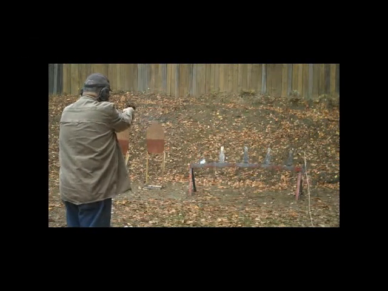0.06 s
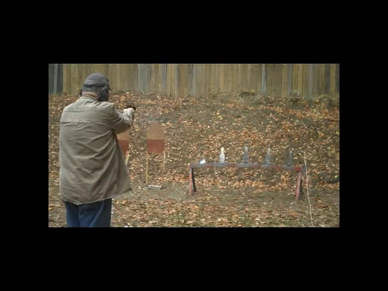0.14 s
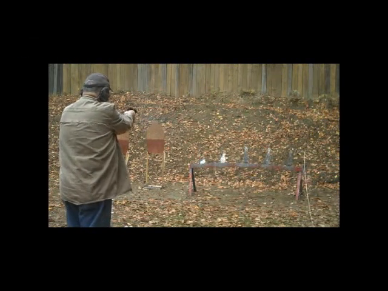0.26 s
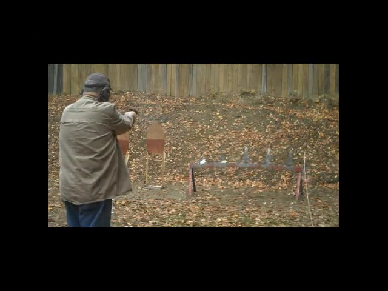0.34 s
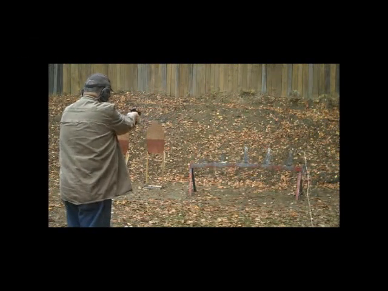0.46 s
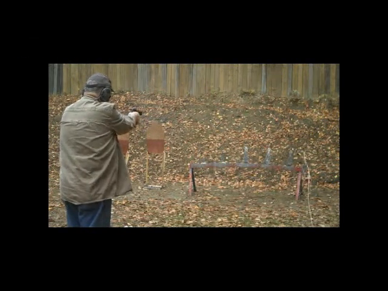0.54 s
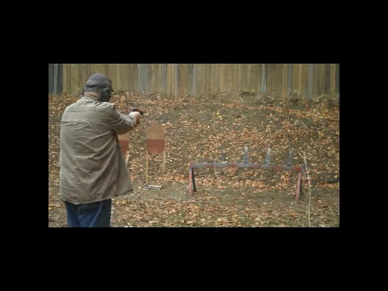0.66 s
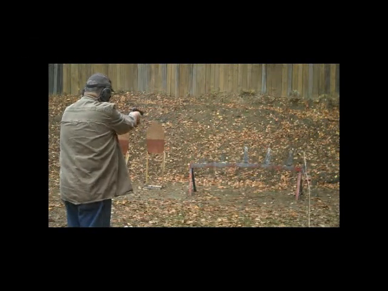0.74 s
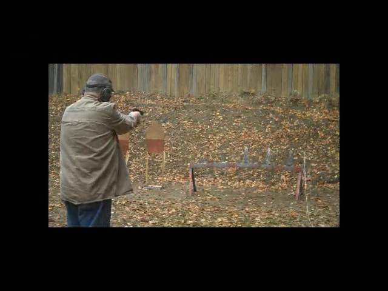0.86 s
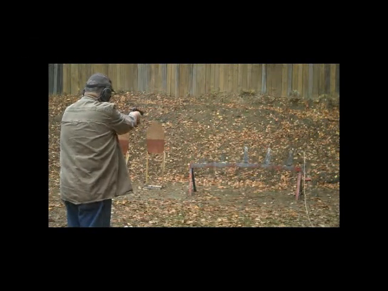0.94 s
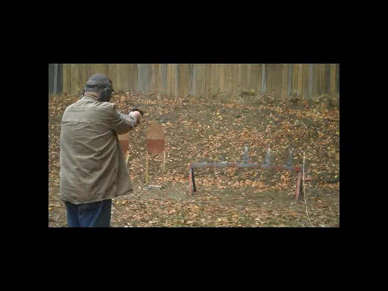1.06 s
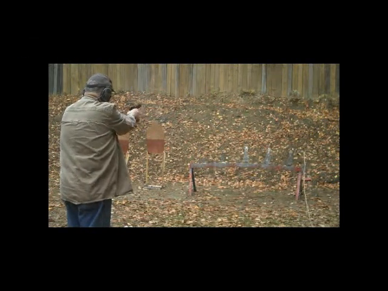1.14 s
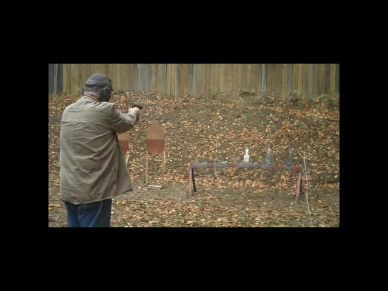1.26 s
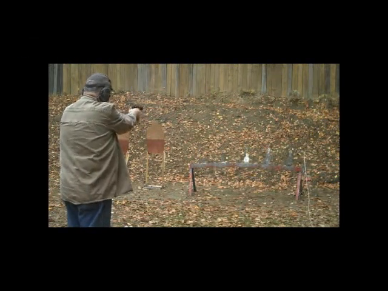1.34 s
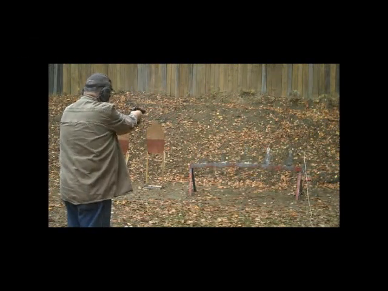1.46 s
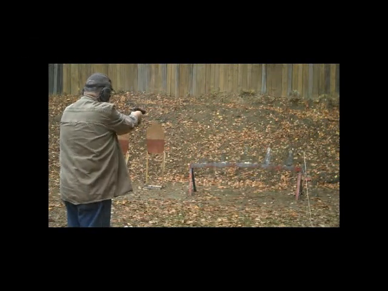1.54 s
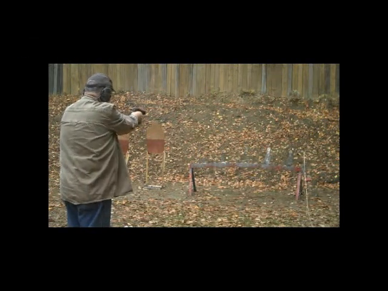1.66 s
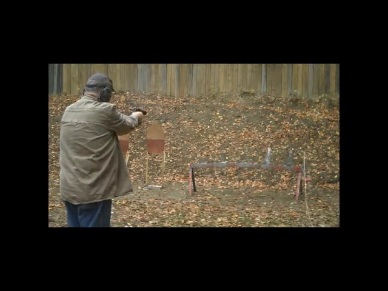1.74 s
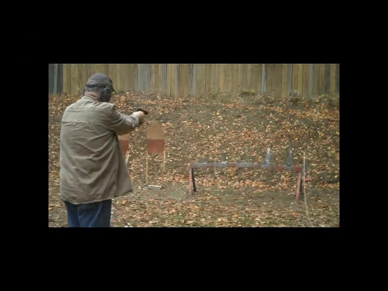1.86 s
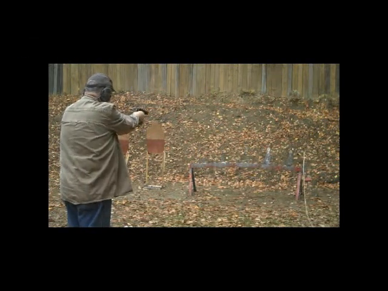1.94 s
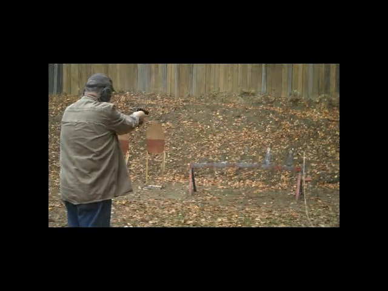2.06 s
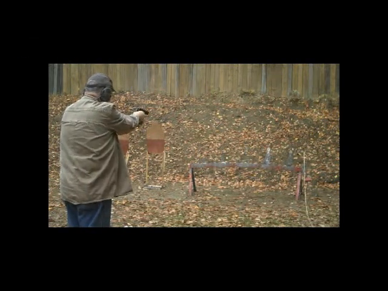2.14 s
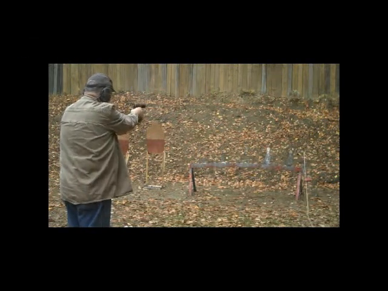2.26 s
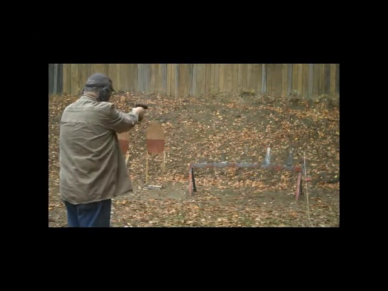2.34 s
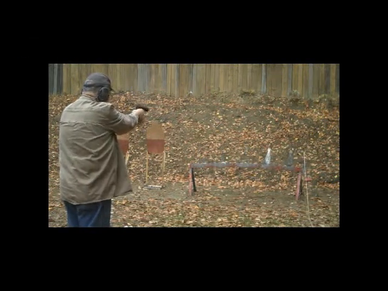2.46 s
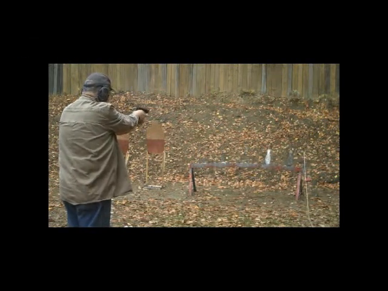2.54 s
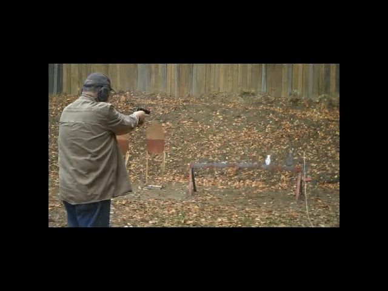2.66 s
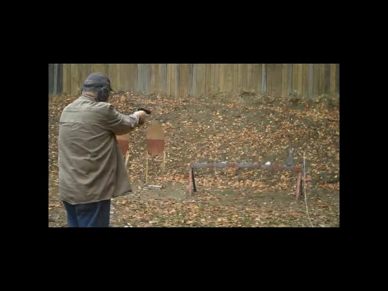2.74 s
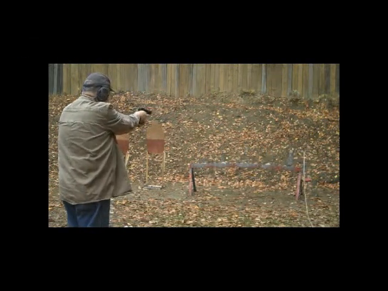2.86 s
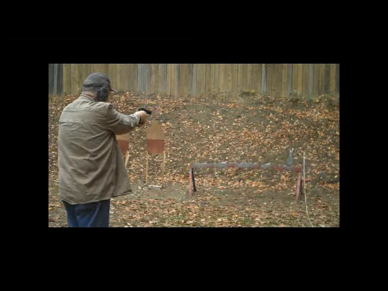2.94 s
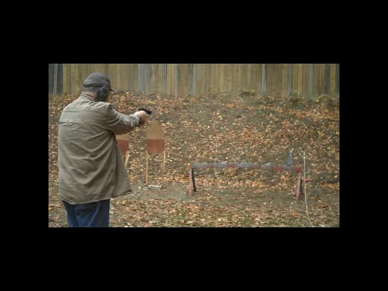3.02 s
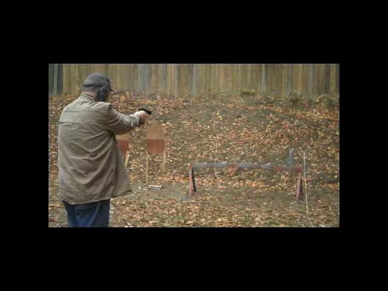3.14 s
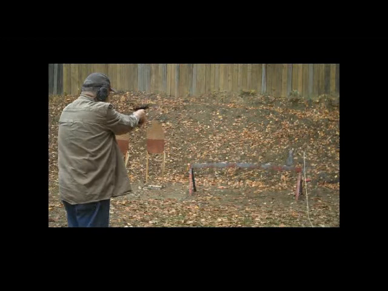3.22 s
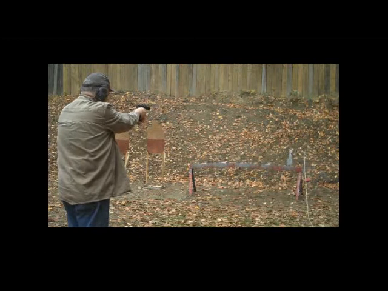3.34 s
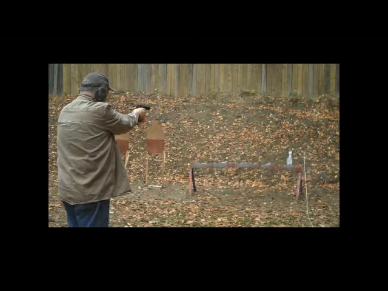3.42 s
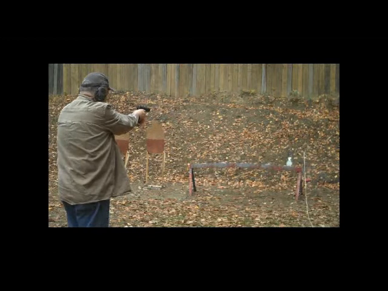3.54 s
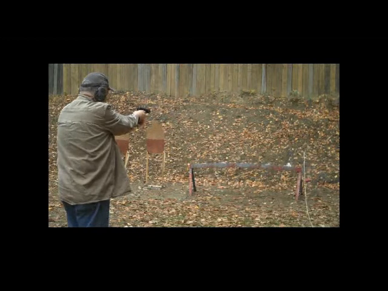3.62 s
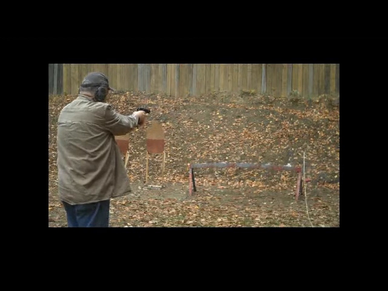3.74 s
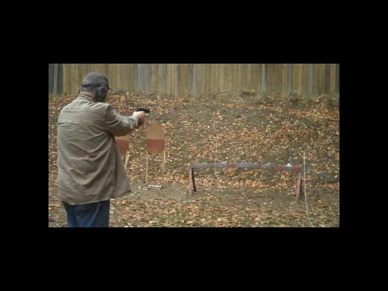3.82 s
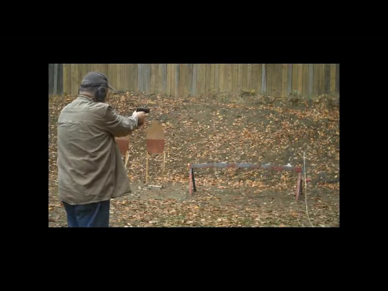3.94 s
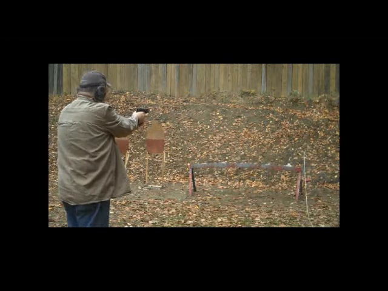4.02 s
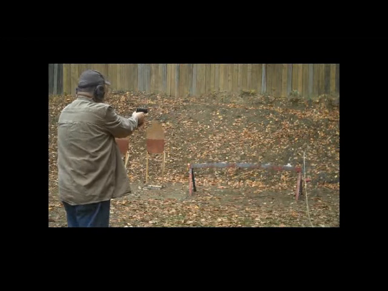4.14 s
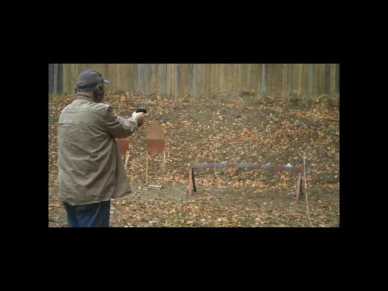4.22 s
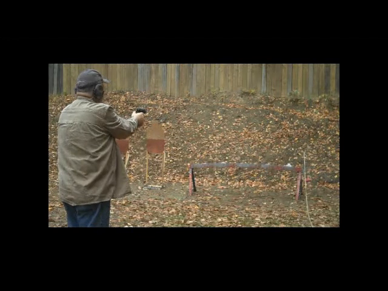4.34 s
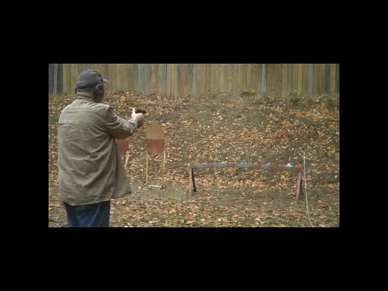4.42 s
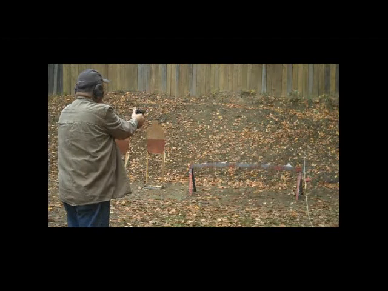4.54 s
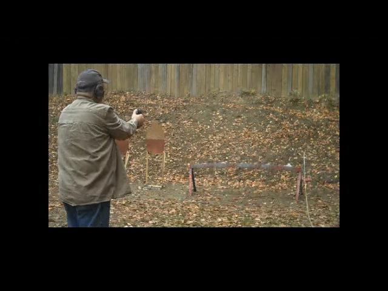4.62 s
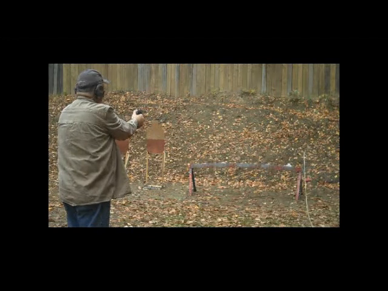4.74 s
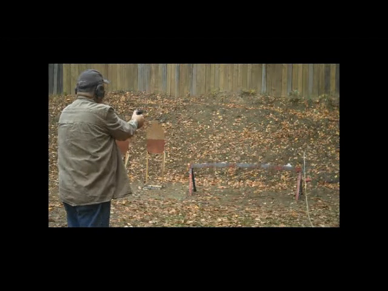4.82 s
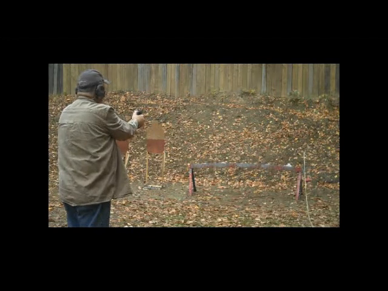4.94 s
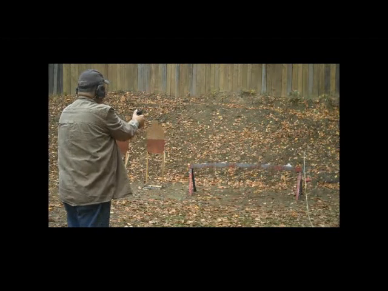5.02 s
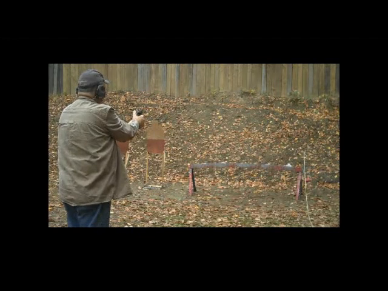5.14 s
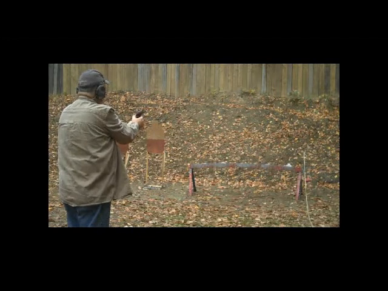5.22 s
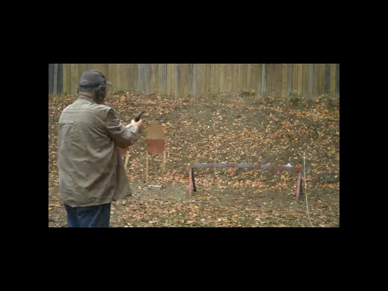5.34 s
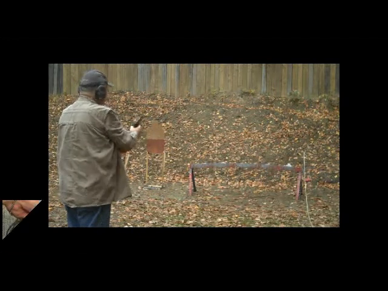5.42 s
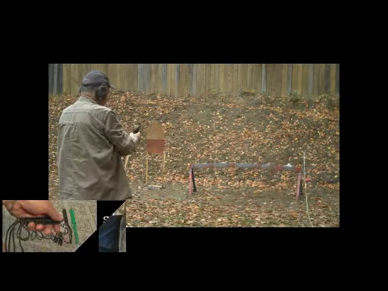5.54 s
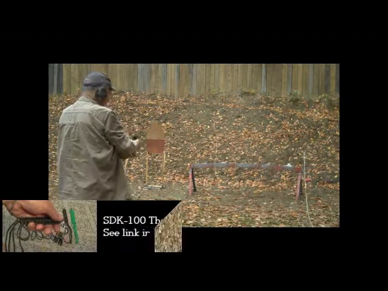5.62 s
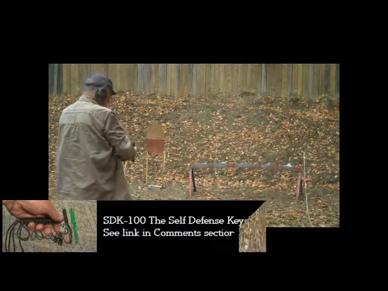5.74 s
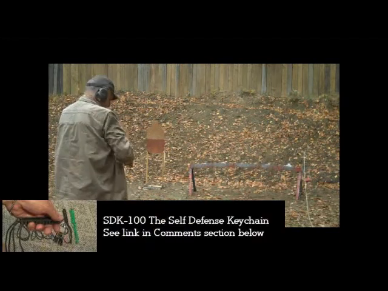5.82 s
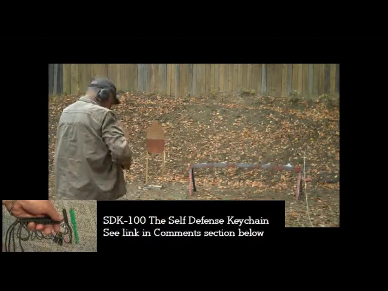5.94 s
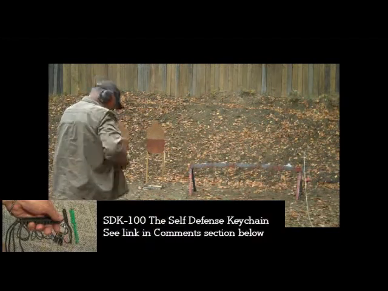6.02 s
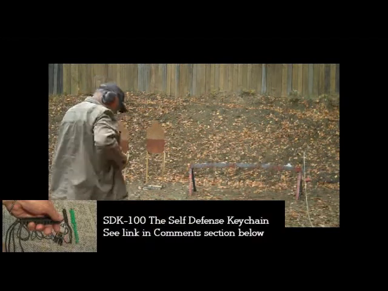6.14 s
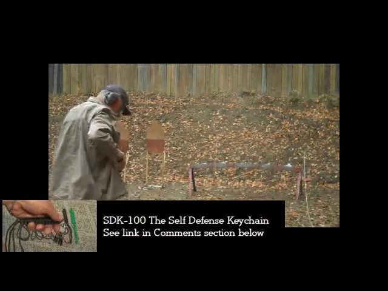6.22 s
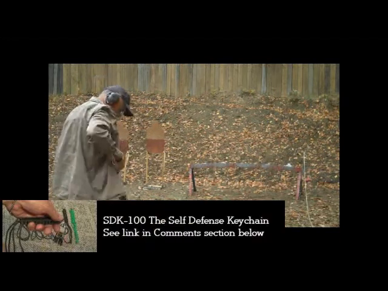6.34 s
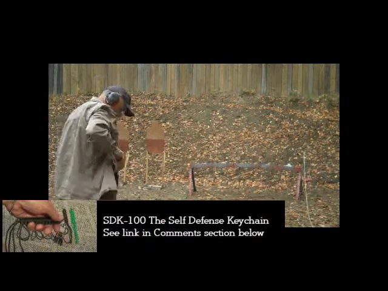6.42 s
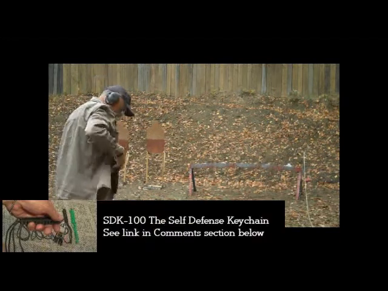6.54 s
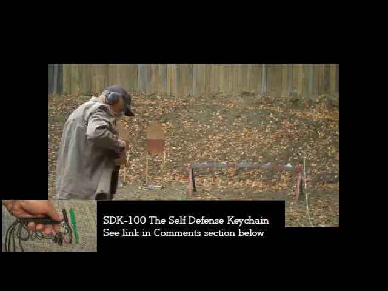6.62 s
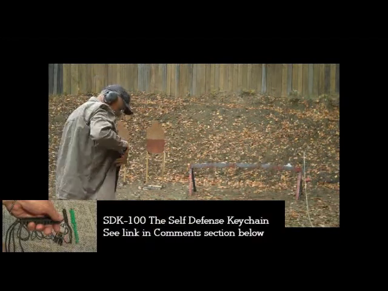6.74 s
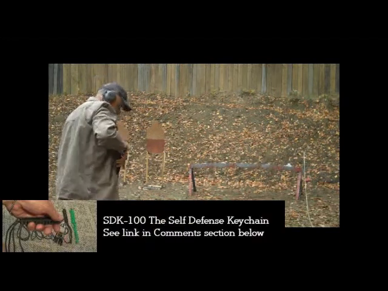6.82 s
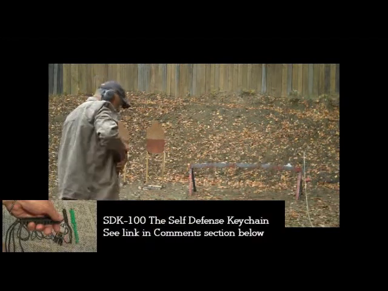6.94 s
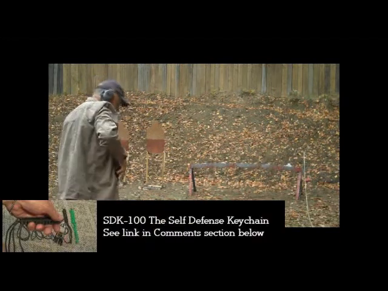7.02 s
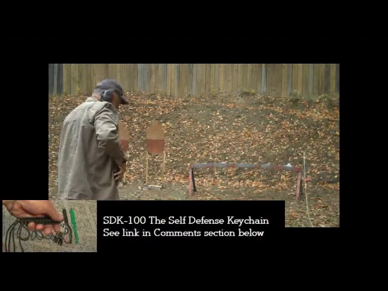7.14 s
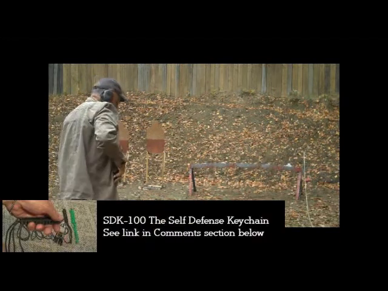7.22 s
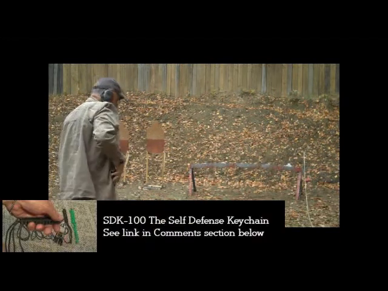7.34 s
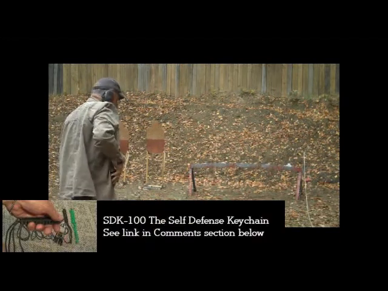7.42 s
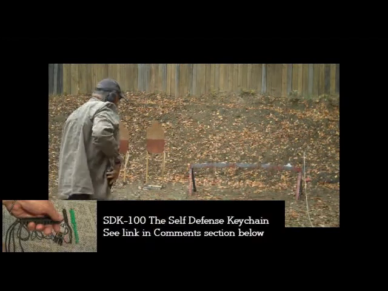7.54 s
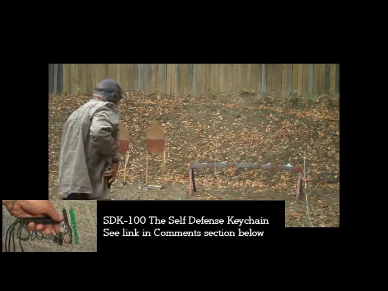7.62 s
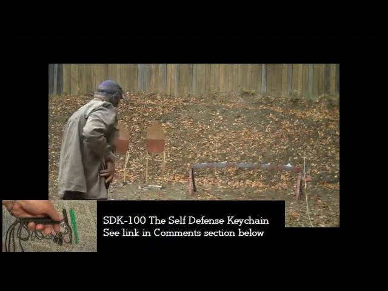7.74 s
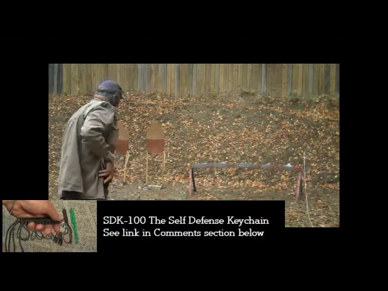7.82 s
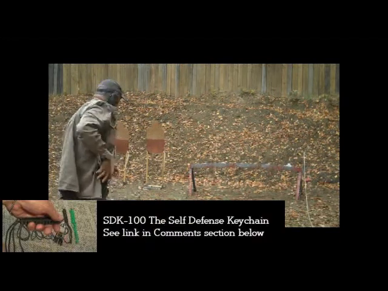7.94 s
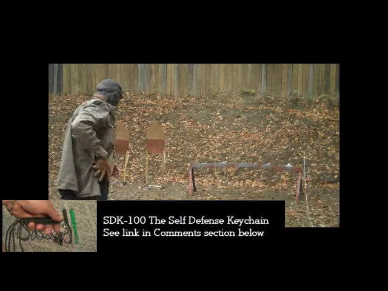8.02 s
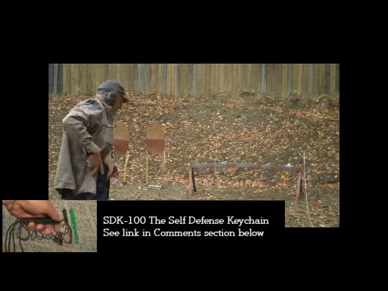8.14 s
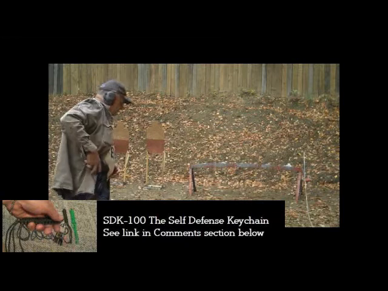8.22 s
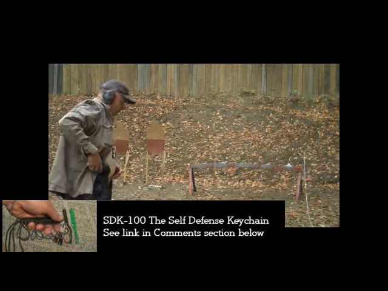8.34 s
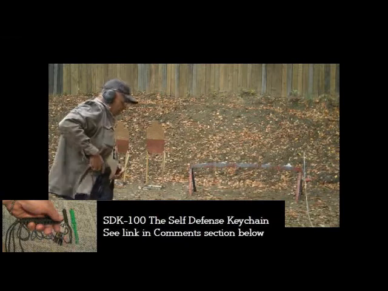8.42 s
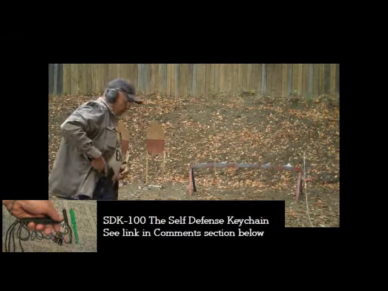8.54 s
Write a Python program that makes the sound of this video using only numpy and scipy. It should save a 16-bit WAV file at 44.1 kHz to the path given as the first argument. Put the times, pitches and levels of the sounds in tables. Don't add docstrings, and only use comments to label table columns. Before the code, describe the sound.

Four heavy gunshots overload a mono outdoor microphone, each followed by quick echoes from fence and trunks and a fading woodland rumble. Metal targets crack, ring with wavering tones and rattle on their rack, while spent cases ping thinly. Quiet clicks lead to a hard metal slide slam, then the gun knocks and scrapes into a plastic holster. Rustling coat strokes and buckle clicks end it above low hum and hiss.

```python
import sys
import numpy as np
from scipy import signal
from scipy.fft import rfft, irfft, next_fast_len
from scipy.io import wavfile
from scipy.ndimage import uniform_filter1d, map_coordinates

SR = 44100
rng = np.random.default_rng(int(sys.argv[2]) if len(sys.argv) > 2 else 0)


def linear_from_db(decibels):
    return 10 ** (np.asarray(decibels, float) / 20)


def int16_out(signal):
    q = np.round(np.clip(np.atleast_2d(signal).T, -1, 1) * 32767)
    wavfile.write(sys.argv[1], SR, q.astype(np.int16))


N = 377937
LEAD = SR // 10

# f/Hz, density/dB per Hz
HUM_SPECTRUM = [(76, -46), (130, -17), (183, -7.5), (282, -13), (330, -5.5), (566, -3.5), (1040, -3.5),
                (1730, -18.5), (3000, -24), (3900, -48), (6600, -120)]
HISS_SPECTRUM = [(900, -36), (1500, -3.5), (2440, -15.5), (3610, -15), (7600, -18.5), (11000, -28),
                 (12000, -36.5), (12400, -77)]
RUMBLE_SPECTRUM = [(4.7, -27.5), (8.0, 2), (16, -2), (27, -10.5), (150, -13), (200, -39.5), (330, -120)]
RUB_SPECTRUM = [(1200, -35.5), (1800, -11.5), (2500, -4.5), (3100, 0.5), (3650, -2.5), (4000, -12),
                (4800, -24.5), (6000, -62)]
SWISH_SPECTRUM = [(2500, -36), (3800, -14.5), (5200, -1), (6300, -9.5), (8000, -10.5), (10000, -17.5),
                  (11500, -25.5), (12300, -57.5)]
# t/s, level/dB
STIRRING = [
    (3.9, -17),
    (4.75, -17),
    (5.05, -20.5),
    (5.8, -12.5),
    (6.3, -2.5),
    (6.5, -1.1),
    (6.87, 1.3),
    (7.1, -1.5),
    (8.57, -1),
]
# level/dB, slope/dB per dB of stirring
BED_LAYERS = [
    (-59.6, .48),
    (-63.5, .95),
    (-72.5, .62),
    (-65.5, .8),
    (-68, 1.05),
]
# t/s, length/s, pressure/dB
COAT_STROKES = [
    (6.72, .2, 3),
    (7.22, 0.36, 4),
    (7.573, 0.29, 6.5),
    (7.878, 0.46, 11),
    (8.26, 0.34, 6.5),
]
# start/s, end/s, level/dB
LEAF_RUSTLES = [
    (.83, .95, -77),
    (1.002, 1.097, -84),
    (1.99, 2.135, -81),
    (3.828, 3.944, -81),
]

# t/s, peak level/dB, f/Hz, tone/dB
SMALL_SNAPS = [(0.8594, -61, 1920, -6), (0.9196, -58, 1880, 0), (1.067, -42, 2310, -9.5),
               (1.075, -46, 4800, -7), (1.958, -58, 6000, 3), (2.0602, -58, 5000, 3),
               (2.1001, -51, 1910, 0), (3.9904, -42, 4827, 12), (4.2494, -61, 1967, -2),
               (4.4593, -49, 4800, 6), (4.5795, -55, 3540, -5), (4.7147, -51.5, 3560, -5),
               (5.1883, -52.5, 5730, 5), (5.3544, -49.5, 3520, -6), (5.4924, -39, 2034, 8),
               (5.616, -52, 3050, -11), (5.8485, -45, 3340, -17), (6.0623, -33.5, 4300, -6),
               (6.122, -39, 3530, -6), (6.1594, -47, 3350, -2), (7.5378, -43, 2420, 0),
               (7.5814, -56, 3090, 0), (7.27, -52, 4800, 0), (8.098, -37, 2940, -14), (8.125, -48, 7000, 0),
               (8.355, -46, 7200, 3), (8.4442, -38, 2160, 5)]
# start/s, end/s, f/Hz, level/dB
THIN_TONES = [
    (4.402, 4.46, 10800, -90),
    (4.55, 4.848, 3575, -85),
    (5.27, 5.55, 3620, -84),
    (5.75, 6.25, 3640, -81),
    (6.04, 6.29, 2073, -74),
    (5.3, 8.5, 1036, -72),
    (7.1, 8.5, 2020, -76),
]

# t/s, hollow level/dB, snap/dB, edge/dB
HOLSTER_KNOCKS = [(6.282, -22.5, -7.5, -11), (6.295, -48, -15, -16), (6.322, -53, -10, -4),
                  (6.339, -36, -5.5, -16), (6.373, -37, -8, -17), (6.384, -33, -5, -9),
                  (6.532, -44, -7.5, -12), (6.56, -41.5, -5.5, -16), (6.678, -39.5, -8, -7.5),
                  (6.699, -50, -12, -20), (6.730, -52, -5, -22), (6.741, -49, -1, -20),
                  (6.752, -51, -2, -22), (6.79, -24.5, -13, -26), (6.806, -25, -13.5, -17),
                  (6.838, -43, -19, -23), (6.881, -38, -10, -25), (6.918, -45, -17, -24),
                  (6.929, -44, -10, -20), (6.941, -41, -12, -14), (6.977, -40, -3.5, -11),
                  (6.988, -29.5, -10, -9)]
# f/Hz, width/Hz, level/dB
SHELL_MODES = [(560, 200, -15), (800, 160, -9), (1310, 200, 0)]
LIP_MODES = [(2310, 300, 1.5), (2900, 350, 0), (3430, 400, -2)]
EDGE_MODES = [(5060, 1300, 2.5), (8200, 3000, -17)]
# start/s, end/s, level/dB, f/Hz
HOLSTER_SCRAPES = [
    (6.30, 6.34, -67, 1300),
    (6.36, 6.39, -53.5, 1500),
    (6.718, 6.774, -58, 2700),
    (6.832, 6.853, -64, 1300),
    (6.40, 6.53, -63, 1200),
    (6.57, 6.67, -63, 1250),
    (6.695, 6.78, -59, 1200),
    (6.89, 6.913, -56, 1300),
    (6.914, 6.961, -51.5, 1500),
    (6.954, 6.977, -52, 2390),
]

# t/s, level/dB, brightness/dB
SLIDE_CONTACTS = [
    (4.829, -54, 0),
    (4.8312, -48, 0),
    (4.8332, -24, 0),
    (4.8338, -27, 0),
    (4.8352, -36, 2),
    (4.8365, -27, -6),
    (4.8375, -28, -2),
    (4.8392, -36, 0),
    (4.8415, -39, 2),
    (4.8465, -42, 0),
]
# f/Hz, width/Hz, level/dB
SLIDE_MODES = [(760, 200, -13), (1420, 120, -14), (2690, 300, 0), (3330, 250, -3), (3870, 400, -6)]
BARREL_MODES = [(4800, 500, -7), (5230, 250, -8), (5620, 250, -5), (6700, 300, -8), (7220, 300, -4),
                (8750, 150, -6), (11270, 260, 1), (11800, 250, -9)]
# f/Hz, density/dB per Hz
SLIDE_TAIL = [(880, -49.5), (1500, -19), (1620, -6), (2650, 1), (4230, 1), (7350, 2), (8140, -3),
              (8940, 3.5), (10200, -13), (11400, 0), (14000, -55)]

# t/s, ring level/dB, f/Hz, tick/dB, t60/s
CASE_LANDINGS = [
    (0.718, -55, 10440, 8.5, 0.24),
    (0.9534, -54, 10460, 10.5, 0.29),
    (1.867, -40.5, 10740, -5, 0.21),
    (2.9683, -67.5, 10600, 17, 0.22),
    (3.979, -50.5, 10800, 11, 0.26),
]

# t/s, level/dB, t60/s, rate/swells per s, first crest/s after the hit
TUMBLES = [
    (-.02, -28.8, .83, 2.97, .11),
    (-.021, -27.8, .65, 3.69, .124),
    (2.227, -43, .62, 9, .014),
    (3.243, -30.4, .85, 12.54, .038),
    (3.244, -30.5, .62, 17.9, .009),
]
# f/Hz, split/Hz
MODE_PAIRS = [(4805, 4.48), (7685, 18.1), (11891, 14), (4921, 19), (7885, 5.1)]
# swell share/0-1, twin share/0-1, late ring level/dB
TUMBLE_FACES = [(.62, .42, -29), (.58, .42, -38), (.3, .42, -33), (.55, .42, -34), (.58, .42, -34)]
# t/s, level/dB, t60/s
IMPACTS = [
    (-.02, -18, 0.027),
    (1.128, -14.5, 0.071),
    (2.227, -18, 0.13),
    (3.243, -10.5, 0.027),
]
# t/s, f/Hz, level/dB, t60/s
TARGET_RINGS = [(-.015, 11580, -43, 0.33), (-.015, 11110, -58, .4), (-.015, 15487, -33, 0.5),
                (-.015, 9604, -54, .4), (1.13, 11003, -46, 0.5), (1.13, 10450, -59.5, 0.19),
                (1.13, 7025, -52, 0.61), (2.226, 8027, -46, 0.64), (2.226, 7187, -52, 0.54),
                (3.244, 11780, -54, .65), (3.244, 15675, -38, .3), (3.244, 11477, -54, .6),
                (3.244, 9254, -54, .6), (2.226, 10700, -60, .6), (1.13, 11488, -56, .35),
                (1.13, 14900, -55, .4), (1.867, 6900, -73, .3)]
# t/s, clang level/dB, grit level/dB, t60/s
FALLS = [(0.362, -51, -48, 0.23), (.484, -56, -51.5, 0.16), (0.515, -56, -52.5, 0.14),
         (.547, -57, -68, 0.14), (.621, -60, -75, .12), (1.449, -46, -67.5, .2), (1.64, -51, -53.5, 0.36),
         (2.02, -68.5, -76.5, 0.17), (2.779, -52, -46, 0.47), (2.808, -46, -61, 0.21),
         (2.92, -55.5, -56, 0.26), (3.62, -48, -52, 0.34), (3.645, -58, -60.5, 0.22),
         (3.76, -65, -57.5, .15)]
# delay/s, clang level/dB, grit level/dB, t60/s
RACK_RATTLE = (.105, -37.5, -49, 0.58)
# f/Hz, width/Hz, level/dB
RACK_MODES = [(3330, 180, 0), (6900, 2200, -2), (9100, 1100, -16.5), (4800, 2000, -8.5), (2010, 2500, -0.5)]
PLATE_MODES = [(6280, 90, 0), (7090, 110, 1), (8950, 90, -9)]

# t/s, blast level/dB, wood level/dB, push level/dB
SHOTS = [
    (-.053, -9, -21.5, -36.5),
    (1.0941, -8.5, -20, -42.5),
    (2.194, -8, -20, -34.5),
    (3.2084, -8.5, -22, -39),
]
# delay/s, level/dB, t60/s
ECHOES = [
    (.008, -3.5, .03),
    (.044, -5, 0.065),
    (.064, -8, 0.012),
    (.0745, 5.5, 0.0087),
    (0.091, -2.5, 0.022),
    (.126, -3.5, .025),
    (0.14, -12.5, 0.012),
    (.170, -13, 0.018),
    (0.181, -5, 0.0092),
    (.205, -11.5, 0.022),
]
# f/Hz, width/Hz, level/dB
FENCE_MODES = [(570, 310, -4), (1150, 500, -4)]
# f/Hz, density/dB per Hz
BLAST_SPECTRUM = [(24, -47.5), (40, -17.5), (575, -3), (1860, -10), (3460, -12), (4020, -19), (4330, -13),
                  (6950, -19.5), (7490, -15), (13600, -34.5), (15400, -68.5)]
SLAP_SPECTRUM = [(59, -51), (100, -9.5), (560, 2.5), (1020, 0), (1590, 4), (1750, -22.5), (4410, -30.5),
                 (5490, -28.5), (12000, -36), (15600, -73.5), (22000, -120)]
WOOD_SPECTRUM = [(24, -58.5), (40, -22.5), (340, -7), (508, -8), (795, -7.5), (947, -8), (1720, -19.5),
                 (2320, -18), (4440, -22.5), (7130, -21), (12300, -32.5), (14000, -44), (15400, -102)]
FAR_SPECTRUM = [(59, -56.5), (100, -29.5), (512, 17), (1990, -1), (5010, -18), (6220, -19), (9970, -34.5),
                (11000, -27), (14300, -46), (22000, -120)]
DEEP_SPECTRUM = [(50, -55.5), (100, -31.5), (200, -25.5), (370, -5.5), (900, 4), (1640, -13.5), (3200, -11),
                 (5000, -18), (7500, -21.5), (10000, -34), (12000, -46.5), (13000, -81.5)]
# f/Hz, t60/s
WOOD_T60 = [(60, 0.29), (120, 0.55), (250, 0.53), (500, 0.74), (1000, 0.9), (2500, 0.72), (5000, 0.65),
            (10000, .5), (14000, .4)]
# f/Hz, level/dB
STRAY = [(60, -32), (110, -32.5), (200, -33.5), (380, -41.5), (700, -36), (1290, -39.5), (2380, -30.5),
         (4390, -30), (8110, -26), (15000, -19.5)]


def unit(x):
    return x / np.sqrt(np.mean(x ** 2) + 1e-20)


def peak(x):
    return x / np.abs(x).max()


def along(points, hz):
    f, v = np.transpose(points)
    return np.interp(np.log(hz + 1), np.log(f + 1), v)


def wobble(rate, size):
    knots = rng.standard_normal(int(size * rate / SR) + 4)
    return map_coordinates(knots, [np.arange(size) * rate / SR])


def noise(spectrum, size):
    m = next_fast_len(size)
    gain = linear_from_db(along(spectrum, np.fft.rfftfreq(m, 1 / SR)))
    return unit(irfft(rfft(rng.standard_normal(m)) * gain, m)[:size])


def resonant(x, peaks, dull_hz=11000):
    m = next_fast_len(2 * len(x))
    f = np.fft.rfftfreq(m, 1 / SR)
    gain = 0
    for k, (hz, width, db) in enumerate(peaks):
        gain = gain + (-1) ** k * linear_from_db(db) * 1j * f * width / (hz * hz - f * f + 1j * f * width)
    top = 1 / (1 - (f / dull_hz) ** 2 + 1.2j * f / dull_hz) ** 3
    return irfft(rfft(x, m) * gain * top, m)[:len(x)]


def add(track, s, x):
    part = track[round(s * SR) + LEAD:][:len(x)]
    part += x[:len(part)]


def fade(t, t60, attack):
    return linear_from_db(-60 * t / t60) * (1 - np.exp(-t / attack))


def stroke(start, end):
    t = np.arange(round((end - start) * SR)) / SR
    return t, np.sqrt(np.abs(np.sin(np.pi * t / (end - start))))


def trees(x):
    hz, t, z = signal.stft(x, SR, nperseg=1024)
    patches = uniform_filter1d(rng.standard_normal(z.shape), size=8, axis=0)
    patches = unit(uniform_filter1d(patches, size=3, axis=1))
    gain = linear_from_db(2 * patches - 60 * t / along(WOOD_T60, hz)[:, None])
    return signal.istft(z * gain, SR, nperseg=1024)[1][:len(x)]


def background():
    t = np.arange(N) / SR
    s, db = np.transpose(STIRRING)
    stir_db = np.interp(t, s, db, left=db[0])
    hum_db, hiss_db, rumble_db, rub_db, swish_db = [db + slope * stir_db for db, slope in BED_LAYERS]
    press_db = 0
    for s, length, db in COAT_STROKES:
        press = np.interp(t, [s, s + .23 * length, s + length], [0, 1, 0])
        press_db = press_db + db * np.sqrt(press)
    traffic_db, traffic_slope = BED_LAYERS[0]
    floor_db = traffic_db + traffic_slope * -10.2
    hum = linear_from_db(np.maximum(hum_db, floor_db) + 0.88 * wobble(3.7, N)) * noise(HUM_SPECTRUM, N)
    rumble = linear_from_db(rumble_db + 2.3 * wobble(9, N)) * noise(RUMBLE_SPECTRUM, N)
    rub = linear_from_db(rub_db + press_db + 1.5 * wobble(30, N)) * noise(RUB_SPECTRUM, N)
    swish_db = swish_db + .4 * press_db
    swish = linear_from_db(swish_db + 1.5 * wobble(200, N) + .8 * wobble(25, N)) * noise(SWISH_SPECTRUM, N)
    hiss = linear_from_db(hiss_db) * noise(HISS_SPECTRUM, N)
    return hum + hiss + rumble + rub + swish


def leaves():
    out = np.zeros(N + LEAD)
    for start, end, db in LEAF_RUSTLES:
        t, swell = stroke(start, end)
        grains = rng.standard_normal(len(t)) * linear_from_db(4 * wobble(300, len(t)))
        add(out, start, linear_from_db(db) * swell * unit(resonant(grains, [(5890, 5000, 0)], dull_hz=9610)))
    return out[LEAD:]


def ticks():
    out, t = np.zeros(N + LEAD), np.arange(SR // 20) / SR
    for s, db, hz, tone_db in SMALL_SNAPS:
        snap = rng.standard_normal(len(t)) * fade(t, 0.011, .0002)
        colour = [(hz, .2 * hz, tone_db + 5.5), (7000, 4000, 0)]
        add(out, s, linear_from_db(db - 6.5) * peak(resonant(snap, colour, dull_hz=9500)))
    for start, end, hz, db in THIN_TONES:
        t, swell = stroke(start, end)
        level = linear_from_db(db) * swell * linear_from_db(3 + 2.5 * wobble(9, len(t)))
        phase = 2 * np.pi * hz * t + 2.4 * wobble(30, len(t))
        add(out, start, level * np.sin(phase))
    return out[LEAD:]


def holster():
    out, t = np.zeros(N + LEAD), np.arange(SR // 8) / SR
    for s, db, snap_db, edge_db in HOLSTER_KNOCKS:
        second = fade(np.clip(t - .0025, 0, 1), 0.0096, 0.00016)
        jolts = fade(t, 0.014, 0.0006) + 0.72 * second + 0.03 * fade(t, 0.2, .004)
        scrape = rng.standard_normal(len(t)) * jolts
        lip = np.array(LIP_MODES) + [0, 0, 4] * rng.standard_normal((3, 1))
        hollow = peak(resonant(scrape, SHELL_MODES, dull_hz=6000))
        snap = peak(resonant(scrape, lip, dull_hz=7000))
        edge = peak(resonant(scrape, EDGE_MODES, dull_hz=8500))
        add(out, s, linear_from_db(db + 1) * (hollow + linear_from_db(snap_db + 6.5) * snap + linear_from_db(edge_db + 1) * edge))
    for start, end, db, hz in HOLSTER_SCRAPES:
        t, swell = stroke(start, end)
        grains = rng.standard_normal(len(t)) * linear_from_db(3 * wobble(300, len(t)))
        add(out, start, linear_from_db(db) * swell * unit(resonant(grains, [(hz, 0.37 * hz, 0)], dull_hz=6000)))
    return out[LEAD:]


def slide():
    out, t = np.zeros(N + LEAD), np.arange(SR // 2) / SR
    for s, db, bright_db in SLIDE_CONTACTS:
        crack = (t == 0) + .25 * rng.standard_normal(len(t)) * fade(t, 0.003, .00005)
        crack = crack[:SR // 10]
        broad = resonant(crack, [(4500, 6000, -13)], dull_hz=9500)
        bright = resonant(crack, BARREL_MODES, dull_hz=11300) + broad
        add(out, s, linear_from_db(db + 25.5) * (resonant(crack, SLIDE_MODES) - linear_from_db(bright_db) * bright))
    swelling = linear_from_db(-48) * linear_from_db(t * 15) * fade(t, 4, .005)
    tail = trees(noise(SLIDE_TAIL, len(t))) * (linear_from_db(-44) * fade(t, 0.057, .002) + swelling)
    add(out, SLIDE_CONTACTS[2][0], tail - linear_from_db(-48) * fade(t, .012, .0005))
    return signal.sosfilt(signal.butter(10, 13300, fs=SR, output='sos'), out[LEAD:])


def cases():
    out, t = np.zeros(N + LEAD), np.arange(SR // 3) / SR
    for s, db, hz, tick_db, t60 in CASE_LANDINGS:
        phase = 2 * np.pi * hz * t + .8 * wobble(60, len(t))
        ring = (np.sin(phase) + .7 * np.sin(.991 * phase)) * linear_from_db(3 * wobble(80, len(t)))
        ring = linear_from_db(-8.5) * fade(t, t60, 0.00033) * ring
        over = linear_from_db(-38) * fade(t, .15, .001) * np.sin(1.36 * phase)
        knock = rng.standard_normal(len(t)) * fade(t, 0.0065, .0001)
        tick = resonant(knock, [(3930, 3500, 7.7)], dull_hz=10200)
        add(out, s, linear_from_db(db) * (ring + over + linear_from_db(tick_db) * tick))
    return out[LEAD:]


def tumbling():
    out, t = np.zeros(N + LEAD), np.arange(SR * 3 // 2) / SR
    for tumble, pair, turning in zip(TUMBLES, MODE_PAIRS, TUMBLE_FACES):
        s, db, t60, rate, crest = tumble
        hz, split_hz = pair
        swell, twin, linger_db = turning
        turns = rate * (t - crest) / (1 + 1.001 * t)
        flutter = linear_from_db((.6 + 3.5 * t) * wobble(30, len(t)))
        face = (1 + swell * np.cos(2 * np.pi * turns)) * flutter
        phase = 2 * np.pi * hz * t + .4 * wobble(25, len(t))
        beating = np.sin(phase) + twin * np.sin(phase + 2 * np.pi * split_hz * t)
        decay = fade(t, t60, .002) + linear_from_db(linger_db) * fade(t, 2 * t60, .002)
        add(out, s, linear_from_db(db) * decay * face * beating)
    return out[LEAD:]


def targets():
    out, t = np.zeros(N + LEAD), np.arange(SR * 3 // 2) / SR
    for s, db, t60 in IMPACTS:
        add(out, s, linear_from_db(db) * fade(t[:SR // 4], t60, 0.00028) * noise(BLAST_SPECTRUM, SR // 4))
    for s, hz, db, t60 in TARGET_RINGS:
        spin = linear_from_db(3 * wobble(25, len(t)))
        phase = 2 * np.pi * hz * t + .7 * wobble(30, len(t))
        decay = fade(t, t60, .002) + linear_from_db(-24) * fade(t, 1.8 * t60, .002)
        add(out, s, linear_from_db(db) * decay * spin * np.sin(phase))
    t = t[:SR // 2]
    rattles = [(s + RACK_RATTLE[0], *RACK_RATTLE[1:]) for s, *_ in SHOTS]
    for s, db, grit_db, t60 in rattles + list(FALLS):
        bumps = rng.standard_normal(len(t)) * linear_from_db(2 * wobble(400, len(t)))
        clang = unit(resonant(bumps, RACK_MODES[:1]))
        grit = unit(resonant(bumps, RACK_MODES[1:], dull_hz=10600))
        grit = grit * (.75 + .6 * np.exp(-t / .006)) + .3 * unit(resonant(bumps, PLATE_MODES))
        add(out, s, fade(t, t60, 0.0011) * (linear_from_db(db - 1.5) * clang + linear_from_db(grit_db) * grit))
    return out[LEAD:]


def shots():
    out, size = np.zeros(N + LEAD), 2 * SR
    t = np.arange(size) / SR
    short = t[:SR // 10]
    wave = (1 - short / .0004) * np.exp(-short / 0.00032)
    slap = peak(resonant(wave, FENCE_MODES))
    place, faces = noise(WOOD_SPECTRUM, size), noise(SLAP_SPECTRUM, size)
    for s, blast_db, wood_db, push_db in SHOTS:
        plateau = np.exp(-(short / 0.018) ** 3) * (1 - np.exp(-short / 0.00027))
        add(out, s, linear_from_db(blast_db - 4) * plateau * noise(BLAST_SPECTRUM, len(short)))

        slaps = 0.33 * faces + 0.32 * noise(SLAP_SPECTRUM, size)
        for delay, db, t60 in ECHOES:
            smear = fade(short, t60, 0.00082) * slaps[round(delay * SR):][:len(short)]
            add(out, s + delay, linear_from_db(wood_db + 6.5 + db) * (1.8 * smear + 1.1 * slap))

        lumps = linear_from_db(1.5 * wobble(60, size))
        answer = trees(0.69 * place + 0.38 * noise(WOOD_SPECTRUM, size))
        add(out, s, linear_from_db(wood_db + 6) * fade(t, 27, 0.0028) * lumps * answer)
        add(out, s, linear_from_db(wood_db - 21.5) * fade(t, 2.94, 0.023) * noise(FAR_SPECTRUM, size))
        add(out, s, linear_from_db(wood_db - 9.5) * fade(t, 1.216, 0.034) * noise(DEEP_SPECTRUM, size))

        rise = np.exp((short[:SR // 200] - .005) / 0.0014)
        add(out, s - .005, linear_from_db(blast_db - 22.0) * rise * noise(BLAST_SPECTRUM, len(rise)))

        push = np.exp(-t / .08) - 11 * np.exp(-(t / .008) ** 2)
        add(out, s, linear_from_db(push_db) * push * (1 - np.exp(-t / 0.0014)))
    return out[LEAD:]


def scene():
    mono = shots() + targets() + tumbling() + cases() + leaves() + ticks() + slide() + holster() + background()
    return np.array([mono, mono])


def gated(x):
    hz, _, z = signal.stft(x, SR, nperseg=2048)
    power = np.abs(z[:1024]) ** 2
    band_db = 10 * np.log10(power.reshape(64, 16, -1).sum(1) + 1e-20)
    frame_db = 10 * np.log10(power.sum(0) + 1e-20)
    flutter_db = 3 * unit(uniform_filter1d(rng.standard_normal(band_db.shape), size=3, axis=1))
    threshold_db = -60 + .69 * frame_db + flutter_db
    keep = 1 / (1 + linear_from_db(np.clip(8 * (threshold_db - band_db), -200, 200)))
    keep = np.where(hz[:1024, None] < 9000, 1, np.repeat(keep, 16, axis=0))
    return signal.istft(z[:1025] * np.vstack([keep, keep[-1:]]), SR, nperseg=2048)[1][:N]


def roll_off(x):
    return signal.sosfilt(signal.butter(12, 15850, fs=SR, output="sos"), x)


def record(dry):
    held = dry / (1 + np.abs(dry / .6) ** 4) ** (1 / 4)
    band = signal.cheby1(10, .5, 14600, fs=SR, output='sos')
    held = signal.sosfilt(band, held) + linear_from_db(-26) * held
    held = np.array([gated(held[0])] * 2)
    hz, _, z = signal.stft(held[0], SR, nperseg=256)
    z = z * linear_from_db(along(STRAY, hz) + 3)[:, None] * np.exp(2j * np.pi * rng.random(z.shape))
    stray = signal.istft(z, SR, nperseg=256)[1][:N]
    mix = held - .0004 + [stray, -stray]
    return roll_off(mix)


dry = scene()
out = record(dry)
int16_out(out)
```